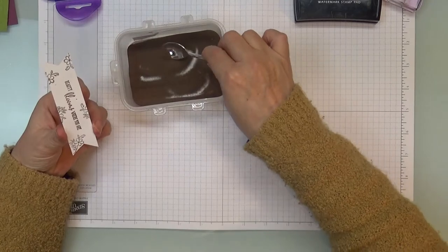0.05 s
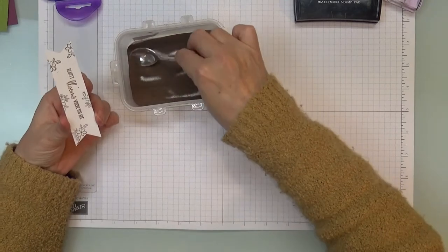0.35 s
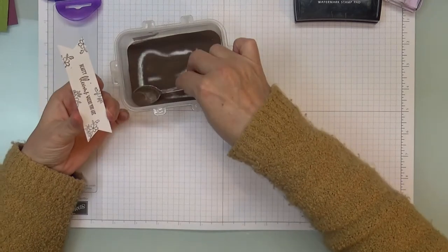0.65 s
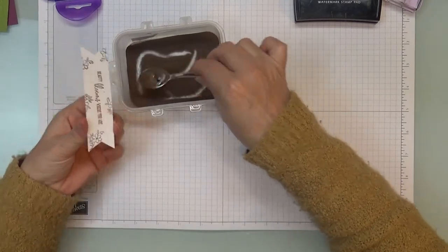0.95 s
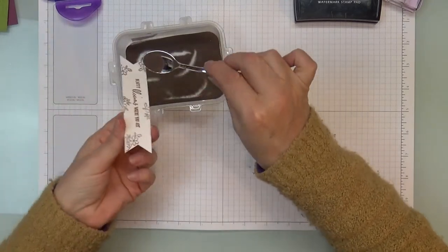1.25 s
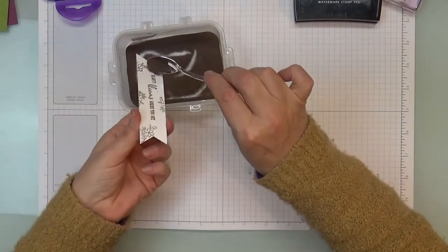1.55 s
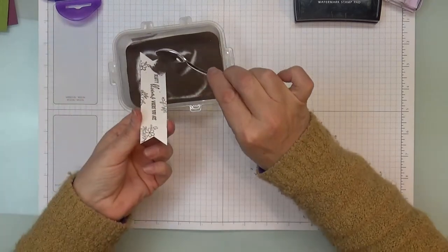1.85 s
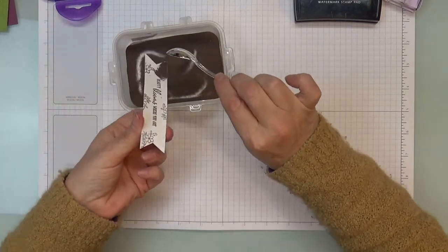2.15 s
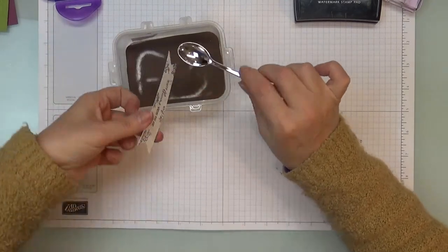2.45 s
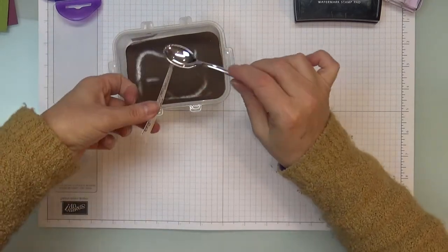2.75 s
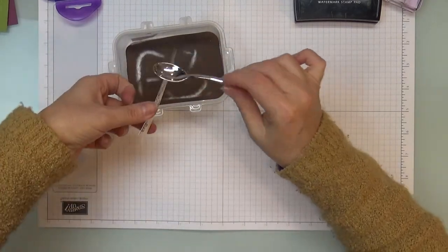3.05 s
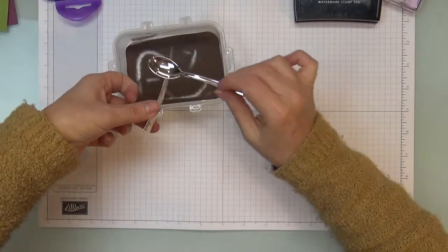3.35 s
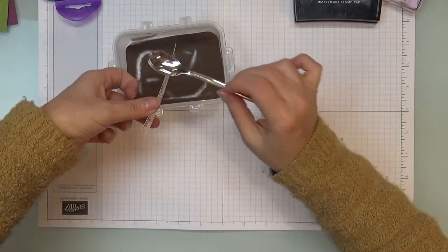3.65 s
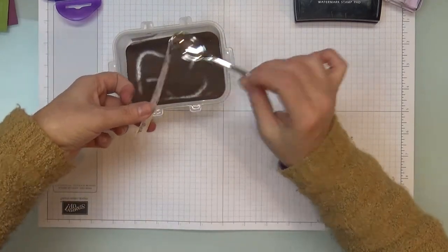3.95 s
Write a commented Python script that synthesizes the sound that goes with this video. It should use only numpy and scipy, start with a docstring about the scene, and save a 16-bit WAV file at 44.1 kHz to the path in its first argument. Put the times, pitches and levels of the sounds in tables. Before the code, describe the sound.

Eight evenly spaced spoon taps on a paper strip follow faint scraping in a plastic tub.

```python
"""A quiet craft room; the camera's own drive hums, whines and flutters throughout.
In the first second a small spoon scrapes through fine powder in a plastic tub, rubbing and catching.
From about 1.5 s the powder pours over a strip of card and fingers shift on it.
From 2.7 s the spoon taps the held card eight times to knock the surplus off: each tap rings the
modes of spoon and card, and the camera's gain control ducks under it."""
import sys
import numpy as np
from scipy import signal
from scipy.fft import rfft, irfft, next_fast_len
from scipy.io import wavfile
from scipy.ndimage import uniform_filter1d, map_coordinates

SR = 44100
rng = np.random.default_rng(int(sys.argv[2]) if len(sys.argv) > 2 else 0)


def store_pcm(level_fs):
    """Save levels as 16-bit WAV."""
    pcm = np.round(np.clip(level_fs, -1, 1) * 32767).astype(np.int16)
    wavfile.write(sys.argv[1], SR, np.atleast_2d(pcm).T)


N = 176400
T = np.arange(N) / SR

# Room air spectrum. Each row: frequency in Hz, relative level in dB.
AIR_SPECTRUM = [(20, -24), (45, -6), (75, -2.5), (130, -5.5), (320, -6.5), (950, -9), (1500, -8),
                (2100, -12.5), (3200, -15), (4000, -19), (5300, -18), (9000, -21), (15500, -25)]
# Stereo image of air and powder noise. Each row: frequency in Hz, left-right likeness 0-1.
NOISE_LIKENESS = [(60, 1.0), (150, 0.87), (380, 0.54), (950, 0.15), (2380, 0.46), (5980, 0.8), (15000, 1)]
# Hum partials. Each row: frequency in Hz, level in dB.
HUM_PARTIALS = [(59.6, -78), (89, -59), (119.9, -72), (178.3, -64.5), (239.7, -67), (266.8, -68.5),
                (359, -71.5), (1673, -68)]
# Drive flutter tones. Each row: frequency in Hz, early level in dB, late level in dB.
FLUTTER_TONES = [(2490, -58, -87), (3370, -66.5, -59)]
# Desk and near walls. Each row: delay in seconds, gain in dB, low-pass corner in Hz.
REFLECTIONS = [(.0023, -15, 9000), (.0053, -18, 9000), (.0085, -16, 2000), (.0098, -16, 2000),
               (.0173, -23, 3000)]
# Room tail decay. Each row: frequency in Hz, T60 in seconds.
TAIL_T60 = [(300, 0.052), (1500, 0.06), (4000, 0.1), (8000, 0.063), (15000, 0.14)]
# Room tail spectrum. Each row: frequency in Hz, gain in dB.
TAIL_SPECTRUM = [(300, -4.5), (1500, -2.5), (3500, -12.5), (6000, -7), (9000, -6.5), (14000, -22.5)]
# Room tail image. Each row: frequency in Hz, left-right likeness 0-1.
TAIL_LIKENESS = [(300, 1), (1200, 0.89), (3000, 0.5), (8000, 0.86)]
# Powder sliding onto the card. Each row: centre in seconds, sigma in seconds, level in dB.
POUR_SWELLS = [(1.62, 0.11, -63.5), (2.14, .05, -63), (2.38, 0.11, -65)]
# Fingers on the card. Each row: centre in seconds, sigma in seconds, level in dB.
FINGER_SWELLS = [(1.685, 0.0079, -46.5), (2.69, 0.013, -50.5), (3.682, 0.0071, -47)]
# Spoon rubbing the tub. Each row: centre in seconds, sigma in seconds, resonance in Hz, level in dB.
TUB_RUBS = [(0.21, 0.071, 1064, -49), (0.3, 0.19, 3030, -55), (0.546, 0.019, 1420, -49),
            (0.645, 0.038, 950, -47)]
# Powder hiss and tub body while scooping. Each row: time in seconds, relative level in dB.
HISS_ENVELOPE = [(0.0, -50), (0.07, -48), (0.16, -49.5), (0.205, -46.5), (0.27, -45), (0.345, -46.5),
                 (0.385, -44), (0.465, -47), (0.538, -42), (0.555, -61), (0.594, -45), (0.606, -40.5),
                 (0.652, -36), (0.684, -42), (0.708, -64), (0.8, -49.5), (0.852, -62.5)]
TUB_ENVELOPE = [(0.0, -48.5), (0.218, -50), (0.355, -50), (0.383, -46.5), (0.402, -47.5), (0.518, -51),
                (0.538, -40.5), (0.57, -63), (0.612, -44), (0.686, -49.5), (0.704, -54.5)]
# Spoon catching. Each row: time in seconds, relative level in dB.
SPOON_TICKS = [(.066, -13), (.112, -15), (.184, -14), (.22, -13), (.225, -8), (.2525, -6), (.365, -14),
               (.379, -11), (.382, -4.5), (.3855, -10), (.4055, -9), (.534, -15), (.605, -9), (.616, -10),
               (.625, -9), (.6445, -3), (.6805, -4), (2.472, -22), (3.716, -19)]
# Spectra of powder hiss, tub body and ticks. Each row: frequency in Hz, relative level in dB.
HISS_SPECTRUM = [(3000, -13.5), (4600, -6.5), (6000, -3), (6700, -13), (8000, -1), (9300, 3.5), (11500, -7),
                 (14000, -13), (16000, -23)]
TUB_SPECTRUM = [(100, -2), (650, 1), (1080, 2), (1650, -0.5), (2300, 3.5), (2750, -2), (3500, -6.5),
                (4500, -5.5), (8000, -53)]
TICK_SPECTRUM = [(300, -35), (1200, -8), (2500, -2), (5500, -12), (6700, -10), (9000, 4.5), (12000, -6),
                 (16000, -28)]
# Spoon taps. Each row: start in seconds, relative strength in dB, contact place 0-1 along the spoon,
# treble shelf in dB, high ring offset in dB.
CARD_TAPS = [(2.7416, -9.5, .5, -13, -6), (2.9227, -2.8, .12, -6, -9), (3.0886, 1.2, 0, -6, -5),
             (3.2545, 3.5, .12, 8, 6.5), (3.4197, 2.7, .84, -2, 3), (3.5844, 3.8, .8, 0, 5.5),
             (3.7562, 4.4, .95, 5.5, 5.5), (3.917, 5.4, .87, -2, -5.5)]
# Modes of spoon against card. Each row: frequency in Hz, width in Hz, gain in dB at place 0, at place 1.
SPOON_CARD_MODES = [(625, 190, -5, 2), (820, 69, -5, 8), (969, 47, -3, 5), (1296, 298, 6, 5),
                    (1548, 62, 5, 13), (1764, 109, 4, 5), (2503, 186, 8, 12), (2815, 270, 14, 17),
                    (3230, 221, 13, 15), (3823, 255, 15, 14), (4876, 562, 8, 11), (5632, 577, 16, 7),
                    (7528, 809, 13, 0), (8176, 170, 7, 20), (9350, 650, -6, 13), (11022, 307, -10, 10),
                    (12680, 711, 4, 4)]
# Antiresonances of spoon and card. Each row: frequency in Hz, width in Hz.
SPOON_CARD_DIPS = [(2040, 160), (4359, 120), (6585, 630), (13385, 440)]


def amp(db):
    """Decibels to gain."""
    return 10 ** (np.asarray(db) / 20)


def unit_rms(x):
    """Scale to rms 1."""
    return x / np.sqrt(np.mean(x ** 2) + 1e-20)


def log_interp(points, hz):
    """Interpolate (Hz, value) points on a log axis."""
    f, values = np.transpose(points)
    return np.interp(np.log(hz + 1), np.log(f + 1), values)


def wobble(knots_per_s):
    """Smooth random curve."""
    return map_coordinates(rng.standard_normal(int(N * knots_per_s / SR) + 4), [T * knots_per_s])


def swells(rows):
    """Sum of Gaussian level swells."""
    return sum(amp(db) * np.exp(-.5 * ((T - centre_s) / sigma_s) ** 2) for centre_s, sigma_s, db in rows)


def filtered(x, response):
    """Apply a complex frequency response."""
    n = x.shape[-1]
    size = next_fast_len(n + SR // 10)
    return irfft(rfft(x, size) * response(np.fft.rfftfreq(size, 1 / SR)), size)[..., :n]


def resonance(f, hz, width_hz):
    """One mode, 1 at its peak."""
    return 1j * f * width_hz / (hz * hz - f * f + 1j * f * width_hz)


def minimum_phase(gain):
    """Response of this gain that starts at once and rings out."""
    cepstrum = irfft(np.log(gain + 1e-4))
    return np.exp(rfft(cepstrum * (1 + np.sign(np.fft.fftfreq(len(cepstrum))))))


def spread(pair, likeness):
    """Two unrelated signals to stereo of a given likeness."""
    angle = lambda hz: np.arccos(np.clip(log_interp(likeness, hz), -1, 1)) / 2
    mid, side = filtered(pair, lambda hz: np.array([np.cos(angle(hz)), np.sin(angle(hz))]))
    return np.array([mid + side, mid - side])


def stereo_noise(spectrum, grain_share=0, grains_per_s=1100):
    """Coloured noise of rms 1, part of it separate grains."""
    grains = unit_rms(rng.standard_normal((2, N)) * (rng.random(N) < grains_per_s / SR))
    pair = np.sqrt(1 - grain_share) * rng.standard_normal((2, N)) + np.sqrt(grain_share) * grains
    coloured = filtered(pair, lambda hz: amp(log_interp(spectrum, hz)))
    return unit_rms(spread(coloured, NOISE_LIKENESS))


def band_noise(hz, width_hz):
    """Noise passed twice through one resonance, rms 1."""
    return unit_rms(filtered(rng.standard_normal(N), lambda f: resonance(f, hz, width_hz) ** 2))


def burst(t60_s):
    """Decaying noise of energy 1."""
    t = T[:SR // 4]
    x = rng.standard_normal(len(t)) * amp(-60 * t / t60_s)
    return x / np.linalg.norm(x)


def add(out, start_s, x):
    """Mix x into out."""
    part = out[:, round(start_s * SR):][:, :x.shape[-1]]
    part += x[..., :part.shape[1]]


def in_room(x, onset_s=.00033):
    """Direct sound, near reflections and a fresh diffuse tail."""
    n = len(x)
    hz, t, bins = signal.stft(rng.standard_normal((2, n)), SR, nperseg=128)
    decay = amp(-60 * t / log_interp(TAIL_T60, hz)[:, None])
    tail = signal.istft(bins * decay, SR, nperseg=128)[1][:, :n]
    tail = spread(tail * (1 - np.exp(-(T[:n] / onset_s) ** 2)), TAIL_LIKENESS)
    tail = filtered(tail / np.linalg.norm(tail[0]), lambda f: amp(log_interp(TAIL_SPECTRUM, f)))
    near = filtered(x, lambda f: 1 + sum(
        amp(db) * np.exp(-2j * np.pi * f * delay_s) / (1 + 1j * f / corner_hz)
        for delay_s, db, corner_hz in REFLECTIONS))
    return near + signal.fftconvolve(x[None], tail, axes=1)[:, :n]


def tone(hz, db, jitter_rad, knots_per_s):
    """Sine at an rms level, with wandering phase."""
    return amp(db) * np.sqrt(2) * np.sin(2 * np.pi * hz * T + jitter_rad * wobble(knots_per_s))


def room_air(level_db=-51):
    """Steady, bass-heavy room noise."""
    return amp(level_db) * stereo_noise(AIR_SPECTRUM)


def drive_hum():
    """The camera's drive hums; each partial wavers on its own."""
    return sum(tone(hz, db + wobble(2.7), jitter_rad=.4, knots_per_s=3.9) for hz, db in HUM_PARTIALS)


def drive_whine(hz=6186, tone_db=-67.5, fuzz_db=-69.5):
    """The drive's thin high tone in a narrow band of noise."""
    whine = tone(hz, tone_db + .2 * wobble(11.5), jitter_rad=.077, knots_per_s=27)
    return whine + amp(fuzz_db) * band_noise(hz, width_hz=260)


def drive_flutter(rate_hz=29.97, first_s=.0096, sigma_s=.0041, shift_s=3.1, crossfade_s=.5):
    """The drive pulses regularly on two tones; the upper takes over around shift_s."""
    from_pulse_s = (((T - first_s) * rate_hz + .5) % 1 - .5) / rate_hz
    late = np.clip((T - shift_s) / crossfade_s + .5, 0, 1)
    tones = sum(tone(hz, early_db + late * (late_db - early_db), jitter_rad=.5, knots_per_s=150)
                for hz, early_db, late_db in FLUTTER_TONES)
    return tones * np.exp(-.5 * (from_pulse_s / sigma_s) ** 2)


def powder_pour():
    """Powder trickles over the card: faint, grainy treble."""
    spectrum_hz_db = [(5000, -27), (8000, 1), (11000, 6), (13000, -20), (16000, -16)]
    return swells(POUR_SWELLS) * stereo_noise(spectrum_hz_db, grain_share=.3)


def finger_shifts():
    """Fingers brush the card: brief midrange noise."""
    spectrum_hz_db = [(200, -14), (800, 2), (1300, 3), (2200, -2), (6000, -25), (12000, -40)]
    return swells(FINGER_SWELLS) * stereo_noise(spectrum_hz_db)


def tub_rubs():
    """Each short stroke of the spoon excites one tub resonance."""
    return sum(swells([(centre_s, sigma_s, db)]) * band_noise(hz, width_hz=380)
               for centre_s, sigma_s, hz, db in TUB_RUBS)


def scoop(tub_gain_db=2, fade_span_s=(.85, 1.05)):
    """The spoon grinds through powder: grains hiss, the tub's body sounds."""
    hiss_db = np.interp(T, *np.transpose(HISS_ENVELOPE)) + 1.6 * wobble(127.9)
    hiss = amp(hiss_db) * stereo_noise(HISS_SPECTRUM, grain_share=.45)
    tub_db = np.interp(T, *np.transpose(TUB_ENVELOPE)) + tub_gain_db + 1.1 * wobble(90)
    tub = amp(tub_db) * stereo_noise(TUB_SPECTRUM, grain_share=.57)
    return (hiss + tub) * np.interp(T, fade_span_s, [1, 0])


def spoon_ticks(gain_db=-5, lead_s=.0005):
    """The spoon catches on the tub: short bright clicks."""
    out = np.zeros((2, N))
    for time_s, db in SPOON_TICKS:
        click = np.roll(burst(t60_s=.005), int(lead_s * SR))  # lead holds the filter's pre-ring
        tick = filtered(click, lambda hz: amp(log_interp(TICK_SPECTRUM, hz)))
        add(out, time_s - lead_s, amp(db + gain_db) * in_room(tick / np.linalg.norm(tick)))
    return out


def spoon_card_response(f, place, treble_db, ring_db):
    """Modes weighted by contact place; bending waves bring the highs first."""
    shelf_hz, top_hz, ring_base_db = 11300, 14700, 20.5
    dip_depth, delay_at_1khz_s = .72, .0009
    power = 0
    for hz, width_hz, db_at_0, db_at_1 in SPOON_CARD_MODES:
        mode = amp(db_at_0 + place * (db_at_1 - db_at_0)) * resonance(f, hz, width_hz)
        power += np.abs(mode) ** 2 / (1 + ((f - hz) / (2 * width_hz)) ** 2)  # steeper skirts
    modes = np.sqrt(power) * amp(treble_db * f ** 16 / (f ** 16 + shelf_hz ** 16))
    ring = amp(ring_base_db + ring_db) * np.abs(resonance(f, hz=14015, width_hz=175))
    dips = np.prod([1 - dip_depth * resonance(f, hz, width_hz) for hz, width_hz in SPOON_CARD_DIPS], 0)
    bending = np.exp(-4j * np.pi * delay_at_1khz_s * np.sqrt(1000 * f))
    return minimum_phase(np.hypot(modes, ring)) * dips * bending / (1 + (f / top_hz) ** 40)


def card_taps(gain_db=.1, chatter_db=-13.5):
    """Each contact is one sharp push and a brief chatter of the card."""
    out = np.zeros((2, N))
    for start_s, db, place, treble_db, ring_db in CARD_TAPS:
        force = amp(chatter_db) * burst(t60_s=.011)
        force[0] -= 1  # the push
        tap = filtered(force, lambda f: spoon_card_response(f, place, treble_db, ring_db))
        add(out, start_s, amp(gain_db + db) * in_room(tap))
    return out


def scene(pan_db=.35):
    """All sources in stereo, taps slightly right."""
    taps = card_taps() * amp([[-pan_db], [pan_db]])
    handling = scoop() + spoon_ticks() + tub_rubs() + powder_pour() + finger_shifts()
    background = drive_hum() + drive_whine() + drive_flutter() + room_air()
    return background + handling + taps


def record(dry):
    """Gain control ducks fast and recovers slowly; then soft clip and band limit."""
    threshold_db, duck_share, attack_s, release_db_per_s = -17.5, .27, .0012, 2
    ceiling, top_hz = .95, 15900
    power = uniform_filter1d(np.mean(dry ** 2, axis=0), size=44)
    excess_db = np.maximum(10 * np.log10(np.abs(power) + 1e-12) - threshold_db, 0)
    release_db = release_db_per_s * T
    duck_db = np.maximum.accumulate(duck_share * excess_db + release_db) - release_db
    pole = np.exp(-1 / (attack_s * SR))
    ducked = dry * amp(-signal.lfilter([1 - pole], [1, -pole], duck_db))
    clipped = ducked / (1 + np.abs(ducked / ceiling) ** 6) ** (1 / 6)
    return filtered(clipped, lambda hz: 1 / (1 + (hz / top_hz) ** 120))


dry = scene()
out = record(dry)
store_pcm(out)
```